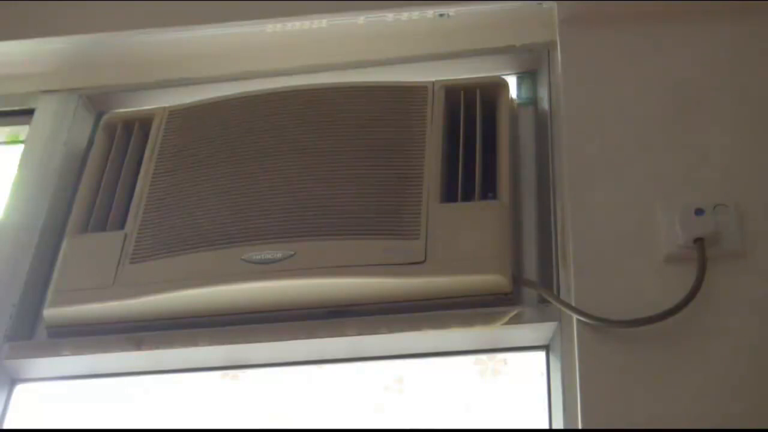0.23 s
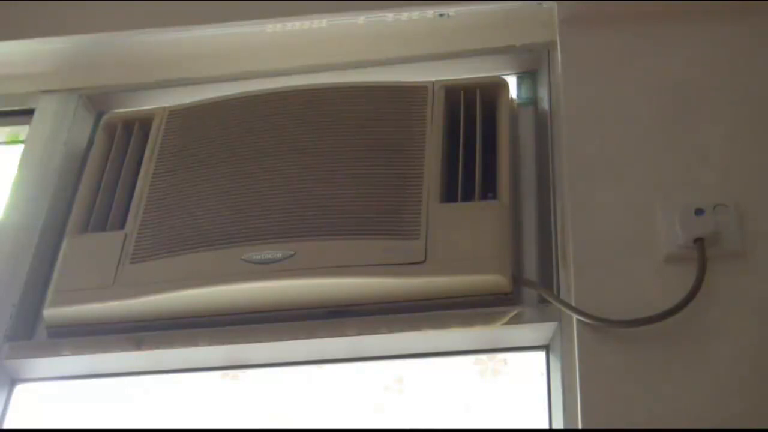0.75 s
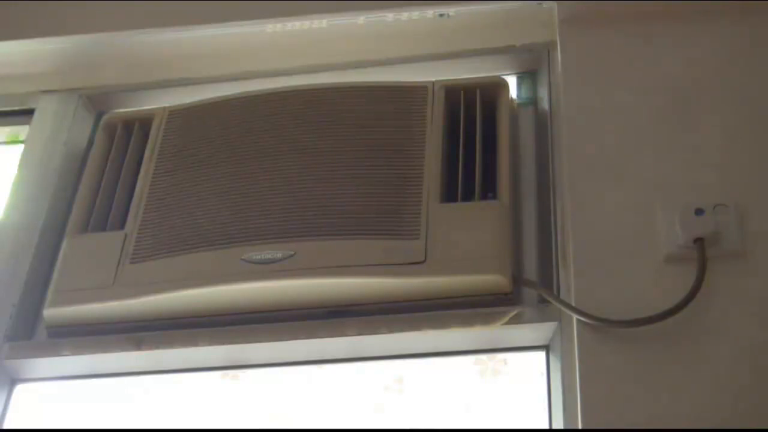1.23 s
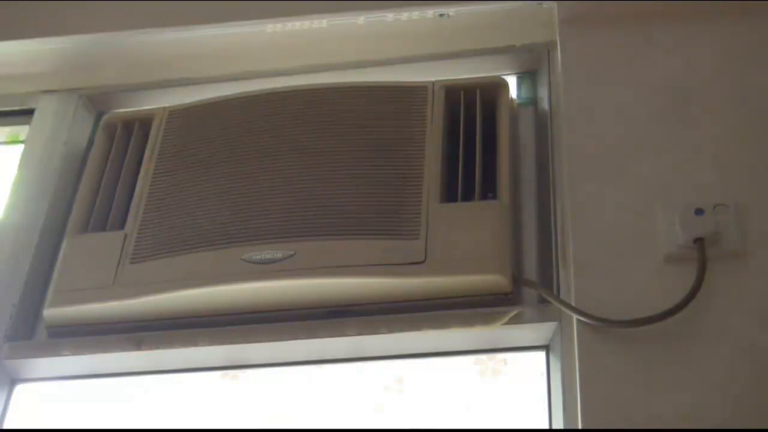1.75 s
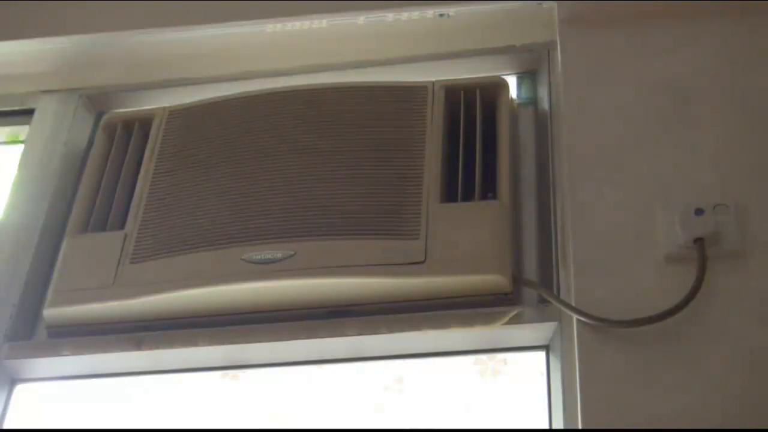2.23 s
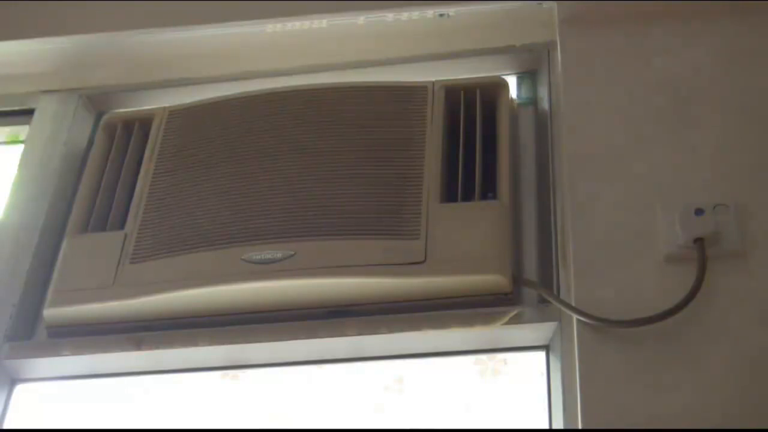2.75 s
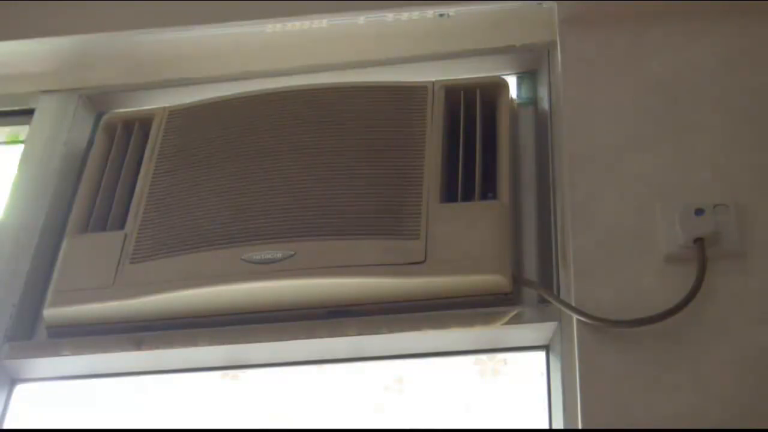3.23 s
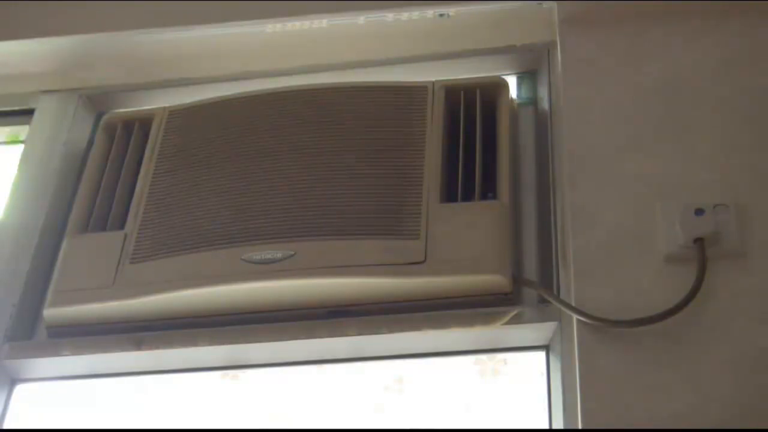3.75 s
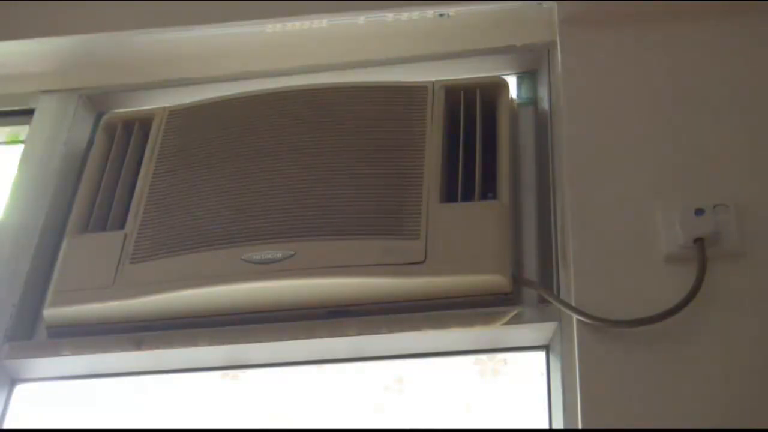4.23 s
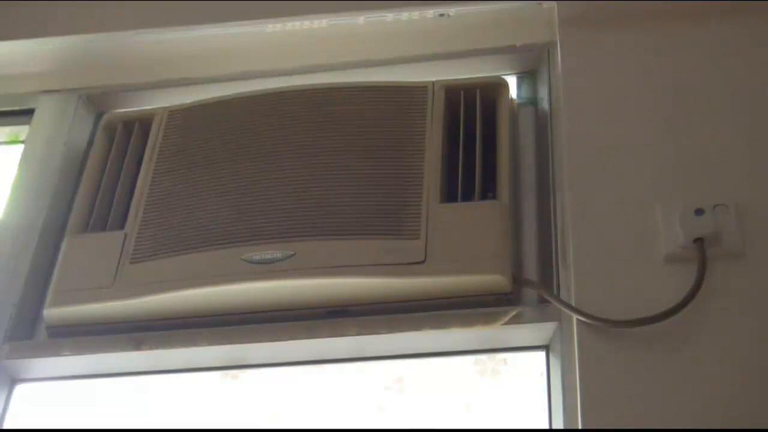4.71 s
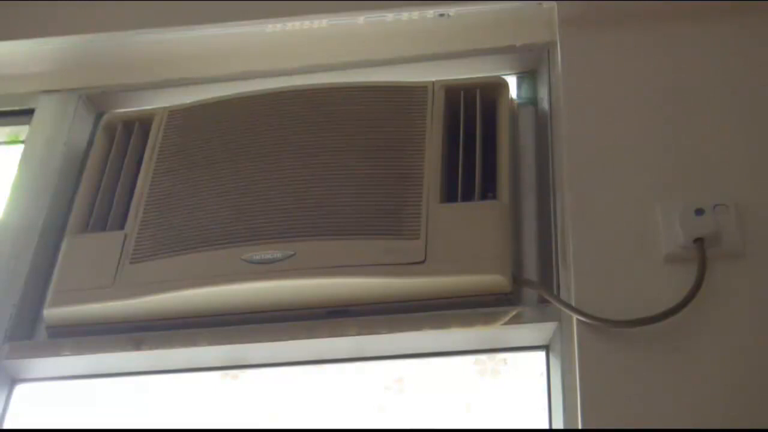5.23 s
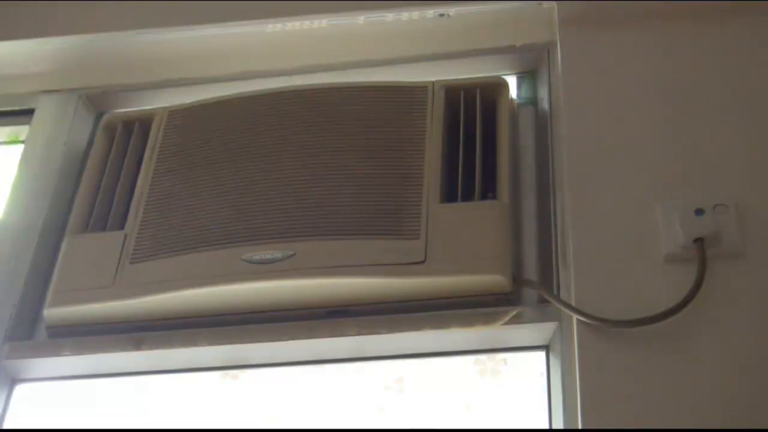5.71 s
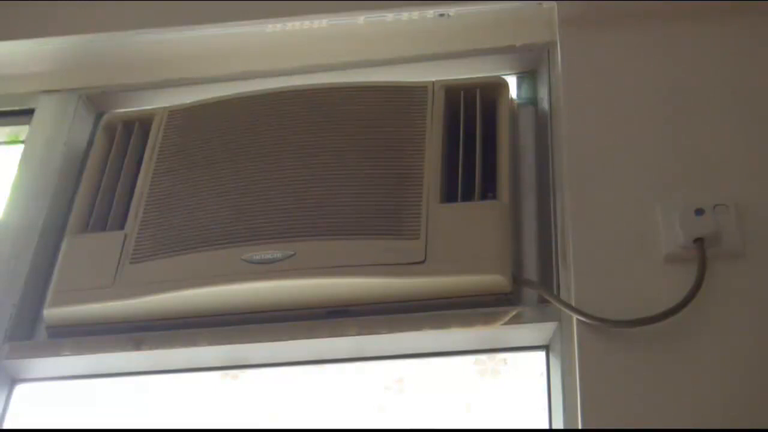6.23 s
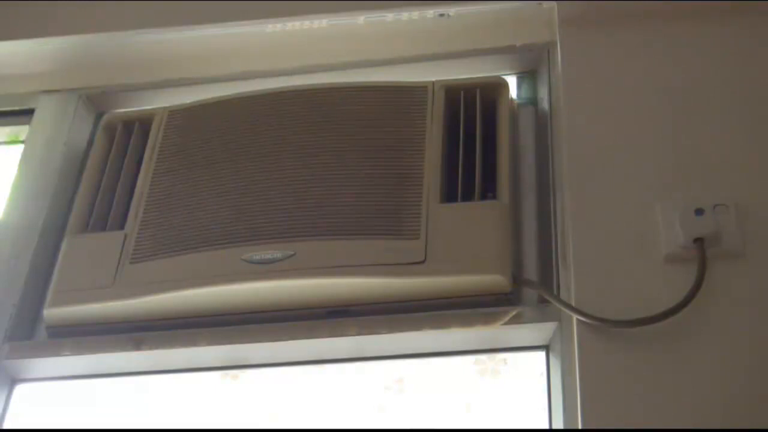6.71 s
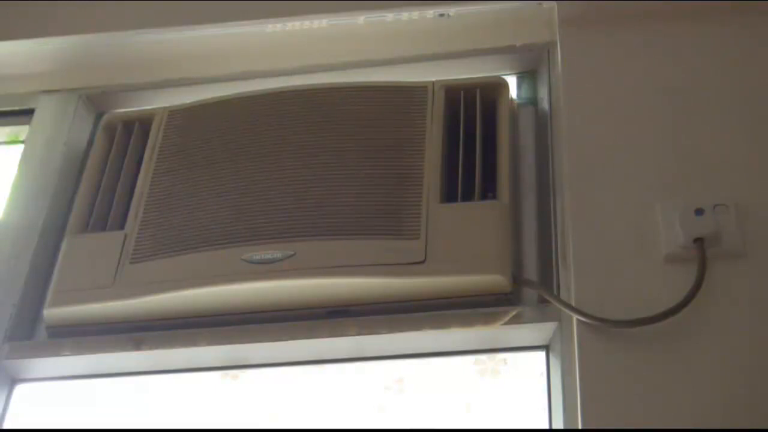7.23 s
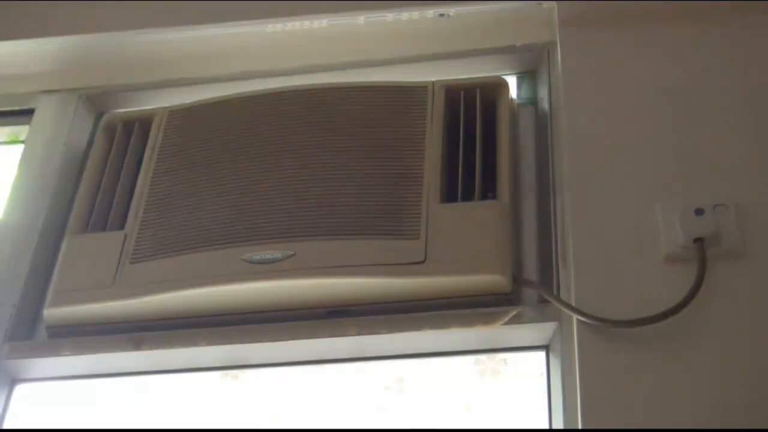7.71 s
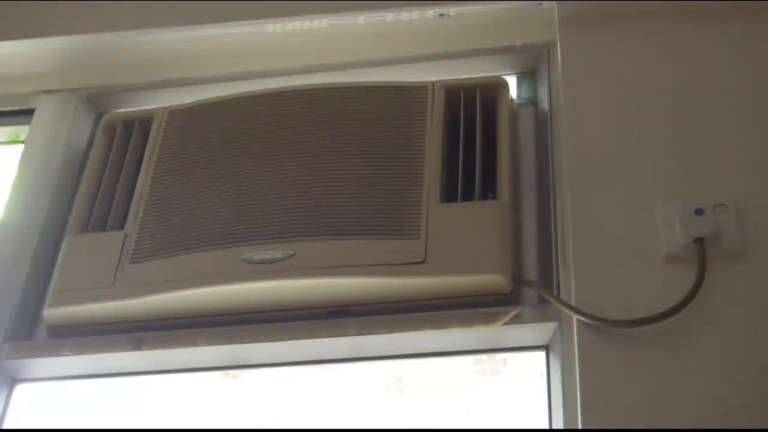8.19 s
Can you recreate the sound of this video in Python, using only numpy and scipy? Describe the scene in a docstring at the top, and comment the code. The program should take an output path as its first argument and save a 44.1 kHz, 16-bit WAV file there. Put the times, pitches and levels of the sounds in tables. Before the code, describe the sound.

Steady mid-pitched fan drone of a room air conditioner, with fast fluttering buzz and airy hiss, its pitch sagging barely noticeably partway through.

```python
"""A window air conditioner runs in a small room, a couple of metres away, from start to end. The five-bladed
fan drones near 350 Hz and whines on multiples of the shaft rate, buzzes the plastic front and chatters a louvre;
shaped noise makes the air rush and the rumble, fixed sines the hum. From 3.2 s the fan slows, its tones change
balance, and a few soft low bumps begin. From 5.05 s it sags further, and near 7.2 s it regains that second loss."""
import sys
import numpy as np
from scipy import signal
from scipy.fft import rfft, irfft, next_fast_len
from scipy.io import wavfile
from scipy.ndimage import uniform_filter1d

SR = 44100
rng = np.random.default_rng(int(sys.argv[2]) if len(sys.argv) > 2 else 0)


def generate_wav(sig):
    """Save sig (samples, or channels by samples) to the path in sys.argv[1] as 16-bit PCM at SR."""
    pcm = np.round(np.clip(np.atleast_2d(sig).T, -1, 1) * 32767).astype(np.int16)
    wavfile.write(sys.argv[1], SR, pcm)


N = 373086

# speed of the free-running fan (turns per second)
FAST_HZ = 14.116
# motor sags that cost the fan speed: (start [s], length [s], speed lost [turns per second])
MOTOR_SAGS = [(3.2, 6, .066), (5.05, 2.13, .032)]
# time the wheel takes to settle at a new speed [s]; loss of speed at which tones have their slowed balance [Hz]
SETTLE_S, SLOWED_BY_HZ = .72, .06
# place in the turn where the wheel swings closest to the front (0-1)
CLOSEST = .77
# the drone: multiple of the shaft rate; level at full speed [dB]; level lost per turn per second lost [dB]
DRONE_ORDER, DRONE_LEVEL_DB, DRONE_DROP_DB_PER_HZ = 25, -19, 3
# blade-pass overtones, before a common trim: (multiple of the shaft rate, level when fast [dB],
# level when slowed [dB], level when slowest [dB], left minus right [dB])
BLADE_OVERTONES = [(15, -53, -54.5, -54.5, 6), (20, -47.3, -50.9, -50.9, 6), (30, -38.3, -43, -43, 8),
                   (35, -36.5, -36, -36.8, 7), (40, -34.3, -33.8, -34.6, 8), (45, -46, -41.8, -42.5, 7),
                   (50, -54, -41, -38.4, 5), (55, -37.6, -40, -42.4, 7), (60, -46, -42.4, -41.3, 4),
                   (70, -51.8, -49, -49, 4), (80, -48.8, -43.6, -43, 2)]
# whine of the uneven wheel, before a common trim:
# (multiple of the shaft rate, level when fast [dB], level when slowed [dB])
WHEEL_WHINE = [(26, -53, -45), (27, -47, -53), (37, -51, -47), (38, -45, -47), (39, -54, -48),
               (48, -49, -48), (77, -50, -60), (92, -47, -51), (95, -42.9, -46.6), (106, -48, -50),
               (107, -50, -46), (130, -41, -43.5), (135, -47, -56), (142, -48, -43.5), (145, -42.6, -53.4),
               (146, -45, -44.5), (150, -42.1, -43), (151, -42.7, -45.5), (152, -46, -44.5),
               (157, -47, -48), (166, -48, -46), (171, -48, -47), (176, -48.6, -45), (177, -46.5, -49),
               (181, -46, -46.4), (182, -54, -45.5), (186, -47.4, -47.4), (187, -50, -47), (202, -48, -49),
               (205, -47.5, -52), (210, -53, -47.5), (220, -43.1, -58), (221, -49, -53), (225, -53, -48),
               (235, -46.3, -53.3), (238, -47.6, -55.5), (240, -43.5, -45.5), (241, -54.2, -49),
               (245, -51.9, -48.8), (250, -48, -52), (255, -47.3, -54), (301, -51, -57), (305, -53.4, -52),
               (341, -51, -58)]
# strength of each blade's shove, relative: (place in the turn [0-1], level when fast [dB], level when slowed [dB])
BLADE_SHOVES = [(.058, -6.5, -5), (.255, -3, -4.5), (.453, -4.5, -6), (.65, 0, 1.5), (.847, -1.2, -4.5)]
# spectrum of the front's buzz, before the cabinet colours it: (frequency [Hz], level [dB per Hz])
BUZZ_SPECTRUM = [(100, -100), (200, -76), (520, -73), (900, -81.5), (1400, -69.5), (1700, -74.5),
                 (1950, -68.5), (2400, -67.5), (3500, -77.5), (5000, -77.5), (8000, -100)]
# modes of the loose louvre, relative: (frequency [Hz], decay time [s], level [dB])
LOUVRE_MODES = [(1676, .0044, 3), (2110, .003, -17), (2580, .003, -18)]
# spectrum of the rushing air, before the cabinet colours it: (frequency [Hz], level [dB per Hz])
AIR_SPECTRUM = [(25, -90), (105, -99), (195.0, -68.5), (250.0, -70), (345.0, -55), (440.0, -63.5),
                (650.0, -60), (850.0, -64.5), (1300.0, -63.5), (1700.0, -64.5), (2600.0, -64),
                (4000.0, -69), (5800.0, -73.5), (8000.0, -80), (11000.0, -84.5)]
# resonances and hollows of the cabinet and louvres:
# (frequency [Hz], width [Hz], lift when fast [dB], lift when slowed [dB])
CABINET_BELLS = [(686, 104, -3.5, -.5), (886, 37, -8, -10), (946, 46, -9, -9.5), (1033, 49, -6, -11),
                 (1173, 53, -5, -4), (1320, 70, 2.5, 0), (1694, 200, 4.5, 4.5), (1935, 60, -4, -4.5),
                 (2094, 143, 3, 3), (2833, 30, 3.5, 2.5), (3032, 96, -6, -7.5), (3114, 51, 5, 5),
                 (3422, 255, 4, 4), (3930, 260, -2.5, -4), (4235, 130, 4.5, 4), (4380, 100, -1, -2.5),
                 (4795, 120, 4.5, 3), (5435, 150, -2.5, -4.5), (5620, 180, 2, 2.5), (8000, 140, -3, -3),
                 (8630, 90, 6, 6), (9140, 105, 7, 7), (9410, 100, -4, -4), (9654, 100, 4, 4),
                 (9992, 110, 4.5, 4.5)]
# share of the room's diffuse sound: (frequency [Hz], side minus mid [dB])
ROOM_SHARE = [(100, -4), (800, -3), (1400, -3.5), (2000, -6), (2600, -9), (3000, -5), (3300, -7),
              (3750, -17), (4400, -9), (4900, -13), (5300, -23), (5900, -14), (7200, -16), (7800, -10),
              (11000, -9)]
# hum of the mains and the compressor: (frequency [Hz], level [dB])
HUM_LINES = [(78, -73.5), (122, -70), (240, -64), (292, -51.5)]
# soft low bumps: (time [s], centre frequency [Hz], peak level [dB])
LOW_BUMPS = [(3.25, 100, -55), (3.73, 65, -54.5), (5.15, 100, -56), (6.37, 70, -56), (7.22, 130, -53),
             (8.38, 85, -56)]
# upper edge of the sound [Hz]
TOP_HZ = 10870


def undb(db):
    """Turn decibels into gain."""
    return 10 ** (np.asarray(db) / 20)


def walk(rate):
    """Wander at random: levels held 1 / rate seconds and smoothed twice; spread near 1."""
    hold = int(SR / rate)
    held = np.repeat(rng.standard_normal(N // hold + 2), hold)
    smooth = uniform_filter1d(uniform_filter1d(held, hold), hold)
    return 1.35 * smooth[:N]


def pan(left_db):
    """Left and right gains, left_db apart, whose mean is 1."""
    gains = undb(np.array([[.5], [-.5]]) * left_db)
    return gains / gains.mean(axis=0)


def tone(turns, order, db, lead):
    """A cosine at a multiple of a turning phase; level is rms dB, lead is in cycles."""
    return np.sqrt(2) * undb(db) * np.cos(2 * np.pi * (order * turns + lead))


def filtered(sound, order, edge_hz, kind):
    """Pass a sound through a Butterworth filter."""
    return signal.sosfilt(signal.butter(order, edge_hz, kind, fs=SR, output="sos"), sound)


def noise_band(low_hz, high_hz):
    """Band-limited noise with a spread of 1."""
    sound = filtered(rng.standard_normal(N), 2, [low_hz, high_hz], "bandpass")
    return sound / sound.std()


def colour(hz, points):
    """Levels in dB along a spectrum, joined on a log-frequency axis."""
    at, db = np.transpose(points)
    return np.interp(np.log(hz), np.log(at), db)


def reflections(sound, db=-17, first_s=.003, decay_s=.012):
    """Window frame, wall and ceiling return a short spray of echoes that ripples the spectrum and blurs pulses."""
    t = np.arange(SR // 16) / SR
    spray = rng.standard_normal(len(t)) * np.exp(-t / decay_s) * (t > first_s)
    echoes = signal.fftconvolve(sound, spray / np.linalg.norm(spray))[:N]
    return (sound + undb(db) * echoes) / np.hypot(1, undb(db))


def radiate(direct, diffuse, spectrum, slowed, bass_left_db=4, treble_left_db=.6, corner_hz=1800):
    """Colour flat sound by a spectrum and the cabinet; its room share reaches the two sides in opposite phase."""
    size = next_fast_len(N)
    hz = np.maximum(np.arange(size // 2 + 1) * SR / size, 1)
    treble = hz ** 2 / (hz ** 2 + corner_hz ** 2)
    # the bass leans left, the treble sits nearly central
    near = pan(bass_left_db + treble * (treble_left_db - bass_left_db)) * rfft(reflections(direct), size)
    room = undb(colour(hz, ROOM_SHARE)) * rfft(reflections(diffuse), size)
    both = near + np.array([[1], [-1]]) * room
    both = both * undb(colour(hz, spectrum)) * np.sqrt(SR / 2)
    centre, width, *lifts = np.transpose(CABINET_BELLS)
    bells = .5 ** np.minimum((2 * (hz[:, None] - centre) / width) ** 2, 50)
    fast, slow = (irfft(both * undb(bells @ lift), size)[:, :N] for lift in lifts)
    return fast + slowed * (slow - fast)


def speed_lost():
    """Turns per second the fan loses: its heavy wheel eases into each sag and out again."""
    t = np.arange(N) / SR

    def ease(at):
        return np.clip((t - at) / SETTLE_S, 0, 1)
    return sum(hz * (ease(start) - ease(start + length)) for start, length, hz in MOTOR_SAGS)


def drone(turns, lost, waver_db=0.27, left_db=6.5):
    """The one loud, clean tone of the blower, a little weaker as the fan slows."""
    db = DRONE_LEVEL_DB - DRONE_DROP_DB_PER_HZ * lost + waver_db * walk(6)
    return pan(left_db) * tone(turns, DRONE_ORDER, db, 0)


def wobble(turns, slowed, fast_db=1.1, slow_db=2.3):
    """The wheel runs slightly out of true: a swell once a turn, deeper when it slows."""
    depth_db = fast_db + slowed * (slow_db - fast_db)
    swell = undb(depth_db * np.cos(2 * np.pi * (turns - CLOSEST)))
    return swell / np.sqrt(np.mean(swell ** 2))


def blade_overtones(turns, lost, trim_db=-0.1, waver_db=0.7):
    """Multiples of the blade-pass rate, each wavering alone in the uneven inflow."""
    out = 0
    for order, fast, slow, slowest, left_db in BLADE_OVERTONES:
        balance_db = np.interp(lost, [0, SLOWED_BY_HZ, lost.max()], [fast, slow, slowest])
        db = trim_db + balance_db + waver_db * walk(3)
        # the duct holds low overtones back, so each blade's pulse is a short falling chirp
        lead = .0023 * (order - 37) ** 2
        out = out + pan(left_db) * tone(turns, order, db, lead)
    return out


def wheel_whine(turns, slowed, trim_db=-0.2, waver_db=1.5, left_db=2):
    """Shaft-rate multiples of the uneven wheel, swelling once a turn and each wavering alone."""
    out = 0
    swell = wobble(turns, slowed)
    for order, fast, slow in WHEEL_WHINE:
        db = trim_db + fast + slowed * (slow - fast) + waver_db * walk(4)
        # standing waves favour one side or the other
        side = pan(left_db + 2 * rng.standard_normal())
        out = out + side * swell * tone(turns, order, db, rng.random())
    return out


def blade_pushes(turns, width, uneven):
    """A smooth shove as each blade passes, width in turns; uneven 0 makes all blades alike; rms 1."""
    push = 0
    for place, db, _ in BLADE_SHOVES:
        from_blade = (turns - place + .5) % 1 - .5
        push = push + undb(uneven * db) * np.exp(-(from_blade / width) ** 2)
    return push / np.sqrt(np.mean(push ** 2))


def each_turn(turns, slowed, size=8192, count=700, blade_db=11.5, order=85):
    """A flat rasp repeating each turn, its treble in part on every blade; the pattern drifts and shifts with slowing."""
    multiple = np.arange(count)
    # below the given multiple of the shaft rate, the blade lines belong to the clean blade tones alone
    on_blade = multiple % len(BLADE_SHOVES) == 0
    weight = np.where(on_blade, undb(blade_db) * (multiple >= order), 1)
    weight = weight / np.sqrt(np.mean(weight ** 2))
    weight[[row[0] for row in WHEEL_WHINE]] = 0  # these multiples sound as tones of their own
    patterns = []
    for _ in range(2):
        lines = weight * np.exp(2j * np.pi * rng.random(count))
        cycle = irfft(lines, size) * size * np.sqrt(FAST_HZ / SR)
        patterns.append(np.interp(turns % 1, np.arange(size) / size, cycle, period=1))
    angle = slowed + 0.23 * walk(1.61)
    return np.cos(angle) * patterns[0] + np.sin(angle) * patterns[1]


def front_buzz(turns, slowed):
    """The plastic front buzzes in step with the shaft: hardest as a blade passes and as the wheel swings close."""
    gate = .76 + .26 * blade_pushes(turns, width=.065, uneven=.5)
    direct, diffuse = (gate * wobble(turns, slowed) * each_turn(turns, slowed) for _ in range(2))
    return radiate(direct, diffuse, BUZZ_SPECTRUM, slowed)


def louvre_chatter(turns, slowed, db=-33.4, scatter_db=1.2, slip_s=.00004, rise_s=0.005, left_db=3.5):
    """Each blade's shove taps a loose louvre, which rings briefly; the hardest tap stands out more as the fan slows."""
    taps = np.zeros(N)
    for place, fast_db, slow_db in BLADE_SHOVES:
        due = np.arange(np.floor(turns[-1]) + 1) + place - .04  # the tap leads the top of the shove
        due = due[due < turns[-1]]
        slip, scatter = rng.standard_normal((2, len(due)))
        at = np.interp(due, turns, np.arange(N)) + slip_s * SR * slip
        at = np.clip(at.astype(int), 0, N - 1)
        taps[at] += undb(fast_db + slowed[at] * (slow_db - fast_db) + scatter_db * scatter)
    t = np.arange(SR // 20) / SR
    ring = 0
    for hz, decay_s, mode_db in LOUVRE_MODES:
        ring = ring + undb(mode_db) * np.exp(-t / decay_s) * np.sin(2 * np.pi * hz * t)
    sound = signal.fftconvolve(taps, (1 - np.exp(-t / rise_s)) * ring)[:N]
    sound = filtered(sound, 3, 1400, "highpass")  # a thin slat radiates no bass
    return pan(left_db) * undb(db) * sound / sound.std()


def air_rush(turns, slowed, flutter_db=0.69):
    """Turbulent air through the grille: noise lightly chopped by the blades."""
    chop = 1 + .11 * blade_pushes(turns, width=.045, uneven=.3)
    flow = chop / chop.mean() * undb(flutter_db * walk(18))
    direct, diffuse = flow * rng.standard_normal((2, N))
    return radiate(direct, diffuse, AIR_SPECTRUM, slowed)


def hum(left_db=4):
    """Faint steady lines of mains and compressor that do not follow the fan."""
    t = np.arange(N) / SR
    return pan(left_db) * sum(tone(t, hz, db, rng.random()) for hz, db in HUM_LINES)


def low_rumble(db=-75, gust_db=5, top_hz=120, left_db=3):
    """A faint, unsteady rumble of low noise under the drone."""
    return pan(left_db) * undb(db + gust_db * walk(9)) * noise_band(30, top_hz)


def soft_bumps(bump_s=0.04, left_db=3):
    """Soft swells of octave-wide noise, each around its own pitch."""
    t = np.arange(N) / SR
    bumps = 0
    for at, hz, peak_db in LOW_BUMPS:
        swell = undb(peak_db) * np.exp(-((t - at) / bump_s) ** 2)
        bumps = bumps + swell * noise_band(hz / np.sqrt(2), hz * np.sqrt(2))
    return pan(left_db) * bumps


def scene():
    """One shaft, its speed trembling slightly, drives every layer of the fan; hum, rumble and bumps run free."""
    lost = speed_lost()
    turns = np.cumsum(FAST_HZ - lost + 0.00501 * walk(7)) / SR
    slowed = np.clip(lost / SLOWED_BY_HZ, 0, 1)  # 0 fast, 1 slowed
    tones = drone(turns, lost) + blade_overtones(turns, lost) + wheel_whine(turns, slowed)
    rattles = front_buzz(turns, slowed) + louvre_chatter(turns, slowed)
    return tones + rattles + air_rush(turns, slowed) + hum() + low_rumble() + soft_bumps()


def record(dry):
    """A steep elliptic low-pass cuts off the top."""
    return signal.sosfilt(signal.ellip(12, .1, 80, TOP_HZ, fs=SR, output="sos"), dry)


dry = scene()
out = record(dry)
generate_wav(out)
```